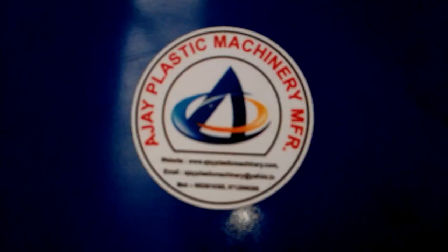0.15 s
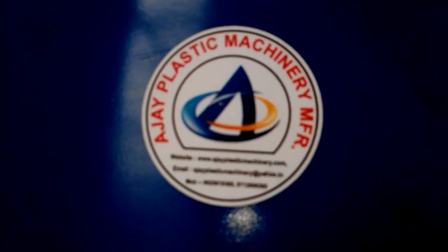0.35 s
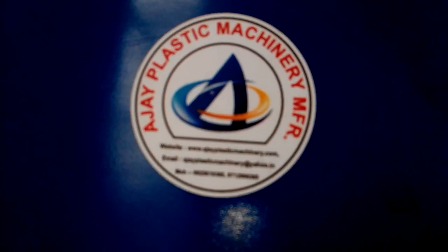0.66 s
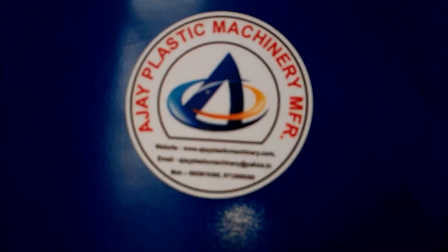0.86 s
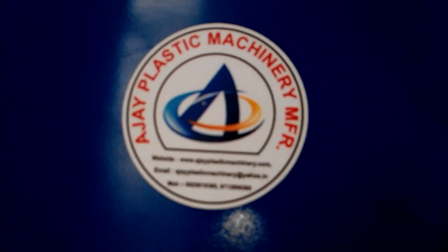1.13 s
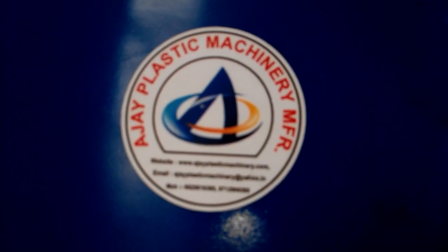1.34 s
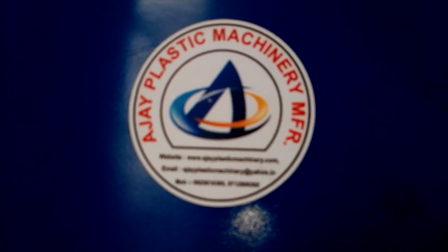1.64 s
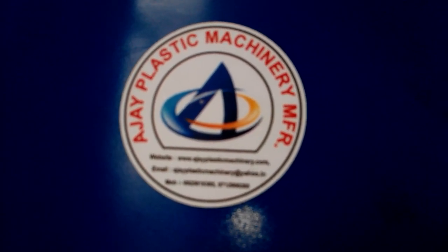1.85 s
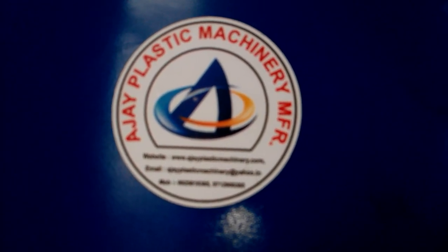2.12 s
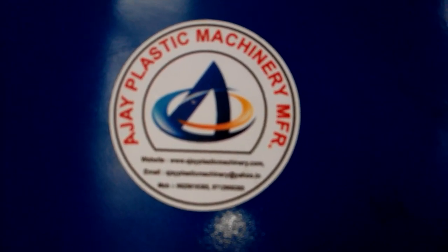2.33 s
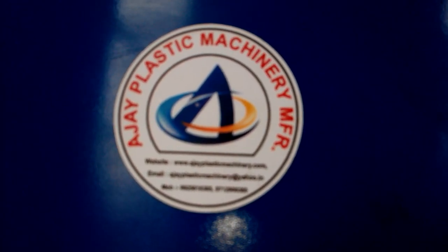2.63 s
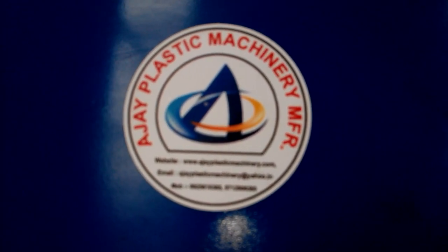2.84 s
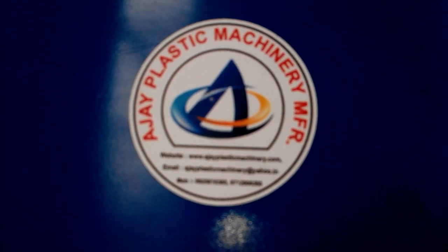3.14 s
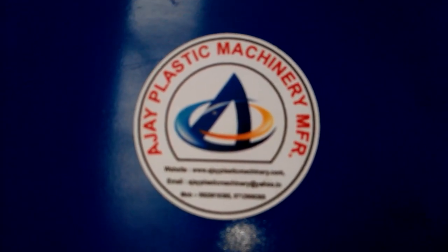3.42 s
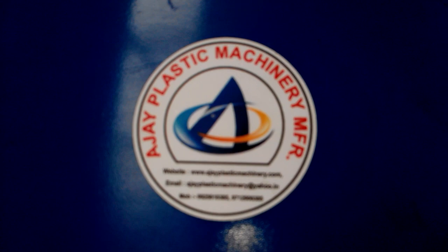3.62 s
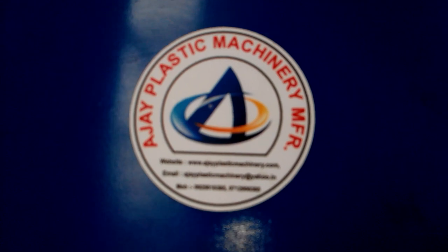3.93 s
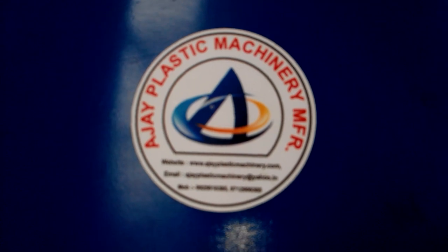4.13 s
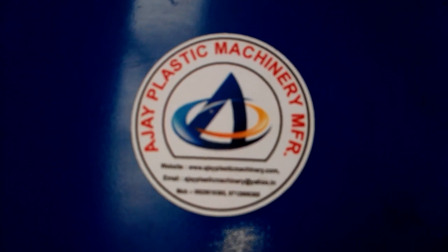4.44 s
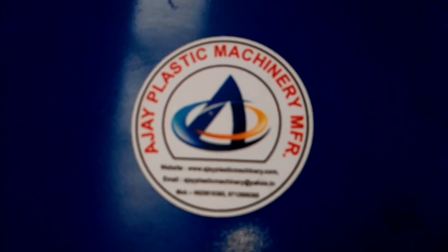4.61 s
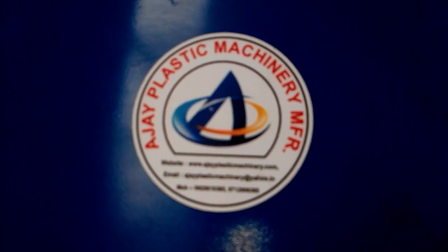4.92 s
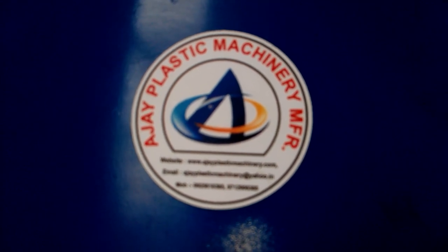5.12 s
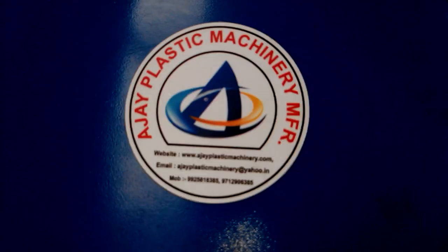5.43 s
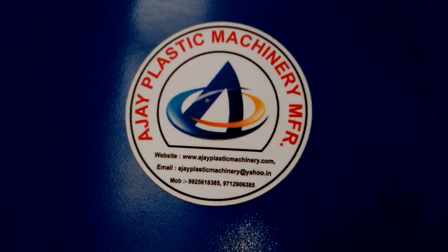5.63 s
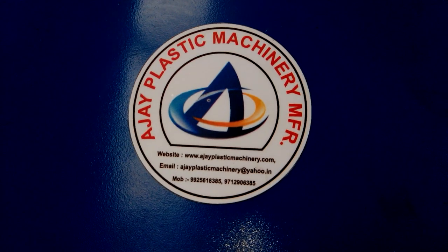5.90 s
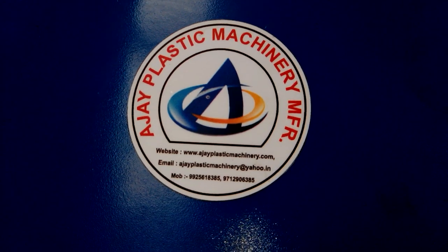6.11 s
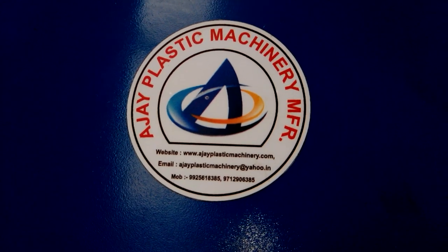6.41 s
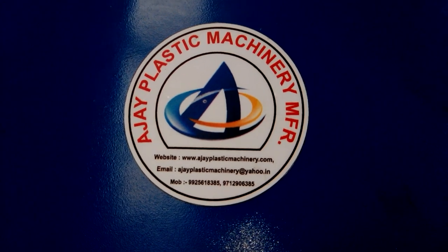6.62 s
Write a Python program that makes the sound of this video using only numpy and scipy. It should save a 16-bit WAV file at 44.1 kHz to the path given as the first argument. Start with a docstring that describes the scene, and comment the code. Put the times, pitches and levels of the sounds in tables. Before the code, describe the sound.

A loud, deep bang opens the sound and dies away in a factory hall over about a second. Close to the microphone, a plastic film blowing machine runs for the whole length, nearly seven seconds. Blower air rushes steadily through ducts over a low rumble, while motors hum with a slow throb, and fans and distant hums waver. A thin, high electrical whine sits above, along with a faint air whistle that swells in short spurts. A dry roller chirps faintly and unevenly, about four times a second. Plastic film gives a few faint swishes in the first 1.5 seconds. A dull, low knock sounds on the casing at 1.8 seconds, and two stronger ones come in quick succession near 4.3 seconds. The film rustles softly again from about 6.1 to 6.5 seconds, and the machine keeps running to the end.

```python
"""A film blowing machine in a factory hall, close to a hand-held two-port microphone. At the start a loud bang
dies away in the hall. Throughout, blower air rushes through ducts, a jet whistles, two motors beat, fans and
hums waver, drive windings whine, a dry roller chirps. Plastic film rustles faintly in the first 1.5 s. Dull
knocks ring the casing at 1.8 s and twice near 4.3 s. The film rustles again just after 6 s."""
import sys
import numpy as np
from scipy import signal
from scipy.fft import rfft, irfft
from scipy.io import wavfile

SR = 44100
rng = np.random.default_rng(int(sys.argv[2]) if len(sys.argv) > 2 else 0)


def wrap_up_sound(samples):
    """Save the sound to the file named by the first command line argument, as 16-bit audio."""
    columns = np.atleast_2d(samples).T
    # keep every value between -1 and 1, then stretch to whole-number steps
    tamed = np.clip(columns, -1, 1)
    steps = np.round(tamed * 32767).astype(np.int16)
    wavfile.write(sys.argv[1], SR, steps)


N = 298116
TIME_S, FREQS_HZ = np.arange(N) / SR, np.fft.rfftfreq(N, 1 / SR)


def gain(db):
    """dB to amplitude factor."""
    return 10 ** (np.asarray(db) / 20)


def over_time(table):
    """Columns after the first, interpolated over time."""
    times_s, *columns = np.transpose(table)
    return [np.interp(TIME_S, times_s, column) for column in columns]


def over_freq(table, hz=FREQS_HZ):
    """Columns after the first, interpolated over log frequency."""
    points_hz, *columns = np.transpose(table)
    return [np.interp(np.log(hz + 1), np.log(points_hz + 1), column) for column in columns]


def drift(rate_hz):
    """Low-passed random curve, rms 1."""
    lowpass = np.exp(-(FREQS_HZ / rate_hz) ** 2) * (FREQS_HZ > 0)
    curve = irfft(rfft(rng.standard_normal(N)) * lowpass, N)
    return curve / np.sqrt(np.mean(curve ** 2) + 1e-20)


def tone(hz, phase_rad=0):
    """Sine of rms 1; hz is a constant or a curve."""
    return np.sqrt(2) * np.sin(2 * np.pi * np.cumsum(np.broadcast_to(hz, N)) / SR + phase_rad)


# Noise between the ports: f/Hz, right minus left/dB, coherence, left lead/rad
PORT_FIELD = [(60, -.5, .998, 0), (180, -1.5, 0.96, 0), (297, 0, 0.99, 0), (440, -3.5, 0.95, 0),
              (950, -2, 0.85, 0.57), (1370, -2, 0.84, -0.8), (2220, -1.9, 0.69, -0.5), (3300, -5, 0.6, .5),
              (4320, -9, 0.2, 1.5), (5400, -6.5, 0.23, 3.5), (6660, -6.5, 0.81, 2.5), (8650, -0.5, 1, 2.5)]

def port_noise(db_per_hz):
    """Shaped noise, partly coherent between the two ports."""
    right_db, coherence, lead_rad = over_freq(PORT_FIELD)
    coherence = np.clip(coherence, 0, 1)
    left, independent = rfft(rng.standard_normal((2, N)))
    right = coherence * left + np.sqrt(1 - coherence ** 2) * independent
    right *= gain(right_db) * np.exp(-1j * lead_rad)
    return irfft(np.array([left, right]) * gain(db_per_hz), N) * np.sqrt(SR / 2)


# Hall reverberation: f/Hz, initial density/(dB per Hz), t60/s
BANG_BANDS = [(25, -79, 1.2), (76.5, -48.5, 1.4), (250, -48, 1.3), (450, -52, 1.17), (850, -69, 1.4),
              (1500, -70.5, 1.8), (2720, -70, 1.5), (4300, -66.5, 1), (6200, -72, 1.1), (8400, -100, .8)]

def bang():
    """Diffuse tail of a heavy blow; each band decays at its own rate."""
    noise = port_noise(over_freq(BANG_BANDS)[0])
    band_hz, frame_s, spectra = signal.stft(noise, SR, nperseg=1024)
    _, t60_s = over_freq(BANG_BANDS, band_hz)
    decay = gain(-60 * frame_s / t60_s[:, None])
    return signal.istft(spectra * decay, SR, nperseg=1024)[1][:, :N]


# Base air spectrum, left port: f/Hz, density/(dB per Hz)
AIR_SPECTRUM = [(25, -91), (45, -72.5), (72, -58.5), (125, -56), (170, -60), (350, -62), (560, -70.5),
                (900, -77.5), (2000, -79.5), (3100, -75), (3900, -69.5), (5500, -75.5), (7300, -81),
                (8500, -100)]
# Duct and panel resonances: f/Hz, width/Hz, lift/dB
DUCT_MODES = [(206.4, 40, 7), (279, 17.7, 7.5), (308.2, 23.7, 5.5), (432, 35, 2), (696, 78, 2.5),
              (1170, 80, 4), (1420, 250, 1.5), (2666, 36, 5.5), (2974, 40, 3.5), (3733, 90, 2.5),
              (4234, 85, 8), (5170, 150, 3)]
# Excitation: t/s, rumble gain/dB, low duct gain/dB, high duct gain/dB
AIR_DRIVE = [(0, -1, 1.5, -6), (.8, 3.5, -0.5, 1.5), (1.5, 0.5, 1, 1.5), (2.1, 3, 1.5, -2),
             (2.6, -8, 2, -6), (3.0, 2.5, -1, -5.5), (3.4, 0, 2.5, 1), (4, 0, 1.5, 0.5), (4.8, 6, 1, 4.5),
             (5.2, -7, 1, 2.5), (5.7, -0.5, -1, 3.5), (6.1, -2, 3, 3), (6.76, -2, 0, 0)]

def blower(gust_db=0.19, flutter_db=1.1):
    """Rushing air over a deep rumble feeds the duct resonances unevenly."""
    rumble_db, drone_db, whistle_db = over_time(AIR_DRIVE)
    air_db, = over_freq(AIR_SPECTRUM)
    lift_db = sum(db / (1 + (2 * (FREQS_HZ - hz) / width_hz) ** 4) for hz, width_hz, db in DUCT_MODES)
    ring_db = air_db + 10 * np.log10(np.maximum(gain(lift_db) ** 2 - 1, 1e-9))  # power above the rush
    deep, high = FREQS_HZ < 90, FREQS_HZ > 3000
    rush = port_noise(np.where(deep, -np.inf, air_db)) * gain(gust_db * drift(7.2))
    rumble = port_noise(np.where(deep, air_db, -np.inf)) * gain(rumble_db)
    drone = port_noise(np.where(high, -np.inf, ring_db)) * gain(drone_db)
    whistle = port_noise(np.where(high, ring_db, -np.inf)) * gain(whistle_db + flutter_db * drift(7.8))
    return rush + rumble + drone + whistle


# Air spurts: centre t/s, half length/s, boost/dB
JET_SPURTS = [(1.08, .06, 6), (2.62, .13, 7), (3.35, .1, 3), (3.96, .04, 8), (5.3, .15, 7), (5.8, .11, 7),
              (6.57, .06, 7)]

def air_whistle(base_db=-53, pitch_hz=5066, scatter_hz=13, rough_db=2, right_db=-13, lead_rad=0.98):
    """A jet at the cooling ring sings on an unsteady pitch and swells in spurts."""
    swell_db = sum(db * np.exp(-((TIME_S - at_s) / half_s) ** 2) for at_s, half_s, db in JET_SPURTS)
    level_db = base_db + swell_db + rough_db * drift(50)
    hz = pitch_hz + scatter_hz * drift(40)
    return gain(level_db) * np.array([tone(hz, lead_rad), gain(right_db) * tone(hz)])


# Throbbing orders: order, main level/dB, twin level/dB, swell t/s
MOTOR_BEATS = [(2, -39.5, -41, 0.54), (3, -50.5, -43, 0.88), (4, -39, -43, 0.2)]
# Mains hum beating with the main motor: order, level/dB, swell t/s
HUM_BEATS = [(2, -48, 0.32), (4, -42.5, .053)]
# Faint orders: order, main level/dB, twin level/dB, mains level/dB
FAINT_ORDERS = [(1, -60, -55.5, -70), (5, -58, -57, -69.5), (6, -61, -54, -52.5), (10, -56.5, -63.5, -69),
                (12, -62.5, -69.5, -70)]
# Main motor, eighth order: t/s, level/dB
EIGHTH_ORDER = [(0, -57), (.45, -40.5), (.75, -58), (1.0, -42), (1.6, -45.5), (2.05, -55.5), (2.55, -53),
                (2.85, -39), (3.3, -51), (3.9, -45.5), (5.35, -47), (5.7, -53), (6.76, -47.5)]

def motors(main_hz=48.977, twin_hz=48.628, mains_hz=49.982, sway_db=1.0, waver_db=2.5):
    """Two motors slip behind the mains by different amounts, so their orders beat."""
    hum, phases_rad = np.zeros(N), rng.uniform(0, 2 * np.pi, 16)

    def partial(order, hz, swell_s=0):
        """In phase with the main motor's order at swell_s."""
        offset_rad = 2 * np.pi * order * (main_hz - hz) * swell_s
        return tone(order * hz, phases_rad[round(order)] + offset_rad)

    for order, main_db, twin_db, swell_s in MOTOR_BEATS:
        hum += gain(main_db + sway_db * drift(2.5)) * partial(order, main_hz)
        hum += gain(twin_db) * partial(order, twin_hz, swell_s)
    for order, db, swell_s in HUM_BEATS:
        hum += gain(db) * partial(order, mains_hz, swell_s)
    for order, *levels_db in FAINT_ORDERS:
        for hz, db in zip((main_hz, twin_hz, mains_hz), levels_db):
            hum += gain(db + waver_db * drift(3)) * tone(order * hz, rng.uniform(0, 2 * np.pi))
    eighth_db, = over_time(EIGHTH_ORDER)
    wavering_hz = main_hz * (1 + .002 * drift(2.02))
    return hum + gain(eighth_db) * tone(8 * wavering_hz)


# Other fans and motors: f/Hz, level/dB
FAN_TONES = [(69.5, -50.5), (278, -46), (320, -52.5), (525, -61), (633, -60.5), (716, -67.5), (1024, -66),
             (1073, -62.5), (1079, -63.5)]

def fans(waver_db=2.5, flutter_hz=1.58):
    """Fan and motor tones, unsteady in level and pitch."""
    hum = np.zeros(N)
    for hz, db in FAN_TONES:
        level_db = db + waver_db * drift(3)
        hum += gain(level_db) * tone(hz + flutter_hz * drift(5.03), rng.uniform(0, 2 * np.pi))
    return hum


# Wavering hums: t/s, low hum level/dB, high hum level/dB
HUM_SWELLS = [(0, -39, -41), (.9, -43, -43), (1.4, -42.5, -38), (2.2, -36.5, -39), (2.55, -53, -44),
              (3.2, -51, -45), (3.5, -40, -39), (3.95, -37, -47.5), (4.4, -38, -33.5), (4.75, -46, -40.5),
              (4.95, -49, -34), (5.55, -47, -37), (6.76, -47, -37)]

def wavering_hums(low_hz=138.2, high_hz=196, waver_db=2):
    """Two hums flutter in pitch, swell and fade."""
    pitches_hz = (low_hz + 1.3 * drift(4.95), high_hz + 3.52 * drift(7.8))
    levels_db = over_time(HUM_SWELLS)
    return sum(gain(db + waver_db * drift(4)) * tone(hz) for db, hz in zip(levels_db, pitches_hz))


# Switching tones: f/Hz, left start level/dB, left end level/dB, right minus left/dB, left lead/rad
STEADY_TONES = [(2991, -55, -70, -3, .3), (3243, -57, -57, -7, .5), (3418, -56, -56, -11, .6),
                (3500, -55, -55, -4, .6), (3581, -60, -60, -1, .6), (3594, -55, -51, -9, 2.6),
                (3797, -58, -58, -8, .5), (3924, -58, -58, -5, .5), (3948, -51, -53, -5, .2),
                (4040, -56, -56, -9, 2), (4052, -46, -43, -14, 3), (4076, -55, -55, -8, 2),
                (4122, -54, -53, -4, 1.5), (4146, -56, -56, -13, 2), (4406, -46, -47, -11, -2.5),
                (4418, -58, -58, -9, 2), (4513, -56, -57, -5, 2), (4589, -61, -61, -9, 2),
                (5202, -62, -62, -6, 3), (5922, -64, -64, -7, 3), (6485, -60, -60, -10, 3),
                (7994, -66, -66, -5, 3), (8006, -66, -66, -5, 3)]
# Strongest switching tones: f/Hz, right minus left/dB, left lead/rad
STRONG_TONES = [(2972, -3, .3), (3877, -9, .4), (3959, -9, -.3), (4000, -5, 1.8), (4500, -16, 1.7)]
# Standing waves at the left port, one curve per strong tone: t/s, level/dB
STRONG_CURVES = [
    [(0, -48), (.75, -51.5), (1.0, -69.5), (1.7, -68), (1.95, -49), (2.5, -61), (3.5, -63), (3.9, -50.5),
     (4.4, -61), (5, -53), (5.6, -64), (6.76, -66)],
    [(0, -47), (1.4, -56), (2.1, -66), (2.9, -46.5), (3.6, -44.5), (4.3, -48), (6.4, -43.5), (6.76, -51)],
    [(0, -43), (1.9, -45.5), (2.4, -42), (3.7, -47.5), (5, -46.5), (5.8, -47), (6.76, -45.5)],
    [(0, -49), (.8, -46), (1.9, -43), (2.6, -50), (4.3, -52.5), (4.85, -66), (5.2, -55), (5.9, -53),
     (6.3, -45), (6.76, -47)],
    [(0, -42), (2.5, -40.5), (3.5, -41), (4.2, -45), (4.55, -41), (5.2, -46.5), (6.05, -46.5),
     (6.76, -41.5)],
]

def drives(steady_trim_db=0.5, strong_trim_db=0.57, waver_db=2.0, strong_waver_db=1.1, jitter_hz=0.57):
    """Windings sing at the drives' switching tones; the ports sway through their standing waves."""
    tones = [(hz, steady_trim_db + np.linspace(start_db, end_db, N), waver_db, right_db, lead_rad)
             for hz, start_db, end_db, right_db, lead_rad in STEADY_TONES]
    for (hz, right_db, lead_rad), curve in zip(STRONG_TONES, STRONG_CURVES):
        tones.append((hz, strong_trim_db + over_time(curve)[0], strong_waver_db, right_db, lead_rad))
    left, right = np.zeros((2, N))
    for hz, db, left_waver_db, right_db, lead_rad in tones:
        pitch_hz = hz + jitter_hz * drift(5.7)
        phase_rad = rng.uniform(0, 2 * np.pi)
        left_db = db + left_waver_db * drift(3.6)
        left += gain(left_db) * tone(pitch_hz, phase_rad + lead_rad + .3 * drift(1.5))
        right += gain(db + right_db + waver_db * drift(5.4)) * tone(pitch_hz, phase_rad)
    return np.array([left, right])


# Rubbing strength: t/s, relative level/dB
ROLLER_RUB = [(.2, -37.5), (.5, -43.5), (1.15, -39.5), (1.75, -38.5), (2.15, -54), (2.75, -44.5),
              (3.4, -38.5), (3.7, -47), (4.1, -45), (4.55, -52), (4.85, -38), (5.3, -42), (5.85, -46),
              (6.2, -41), (6.45, -49), (6.76, -44)]

def roller(turn_s=.2287, chirp_at_s=.222, half_s=.022, pitch_hz=1174, scatter_hz=18, trim_db=-7.0):
    """A dry roller squeaks roughly once a turn, with uneven chatter between."""
    from_chirp_s = (TIME_S - chirp_at_s + turn_s / 2) % turn_s - turn_s / 2
    chirps = np.exp(-(from_chirp_s / half_s) ** 2)
    chatter = np.minimum(gain(-11 + 5 * drift(15)), 1)
    rub_db, = over_time(ROLLER_RUB)
    squeak = tone(pitch_hz + scatter_hz * drift(80)) * gain(trim_db + 2.5 * drift(50))
    return gain(rub_db) * np.maximum(chirps, chatter) * squeak


# Rustles: centre t/s, half length/s, peak density/(dB per Hz), centre f/Hz, width/octaves
FILM_RUSTLES = [(0.15, 0.017, -74, 6000, 0.21), (.44, .03, -74, 5900, 0.22), (.88, 0.044, -78, 5500, 0.23),
                (1.383, 0.033, -76, 1400, 0.27), (6.134, .04, -78.5, 1400, 0.98),
                (6.258, 0.028, -74, 900, 1), (6.273, 0.084, -75.5, 2300, .3), (6.375, 0.032, -67, 560, .5),
                (6.449, .025, -75.5, 1400, 1)]

def film(grain_db=2):
    """Short, grainy swishes of plastic sheet."""
    swishes = np.zeros((2, N))
    for at_s, half_s, db, hz, width_oct in FILM_RUSTLES:
        band = port_noise(db - 4.0 * (np.log2((FREQS_HZ + 1) / hz) / width_oct) ** 2)
        swishes += band * np.exp(-((TIME_S - at_s) / half_s) ** 2 / 2)
    return swishes * gain(grain_db * drift(70))


# Blows on the casing: t/s, level/dB
BLOWS = [(1.843, -26), (4.241, -20.5), (4.333, -19.5)]
# Casing modes: f/Hz, gain/dB, t60/s
CASING_MODES = [(76.4, -5, .18), (107, -3, 0.15), (166, -10.5, 0.15), (232, -5.5, 0.15)]

def knocks(highpass_hz=65):
    """Soft blows ring the low modes of the casing, which cannot radiate deep bass."""
    ring = np.zeros(N)
    for at_s, blow_db in BLOWS:
        age_s = np.maximum(TIME_S - at_s, 0)
        for hz, mode_db, t60_s in CASING_MODES:
            ring += gain(blow_db + mode_db - 60 * age_s / t60_s) * np.sin(2 * np.pi * hz * age_s)
    return signal.sosfilt(signal.butter(3, highpass_hz, "high", fs=SR, output="sos"), ring)


def pan(mono, right_db):
    """Mono to stereo, left at unity."""
    return mono * gain([[0], [right_db]])


def scene():
    """The running machine and the brief sounds around it."""
    machine = blower() + air_whistle()
    machine += pan(motors() + fans(), right_db=-1.26)
    machine += pan(wavering_hums(), right_db=-1.2)
    machine += drives()
    machine += pan(roller(), right_db=-3.0)
    return bang() + machine + film() + knocks()


def record(dry, cutoff_hz=8650):
    """Steep low-pass band limit."""
    lowpass = signal.firwin(601, cutoff_hz, window=("kaiser", 9), fs=SR)
    return signal.oaconvolve(dry, lowpass[None], "same")


dry = scene()
out = record(dry)
wrap_up_sound(out)
```